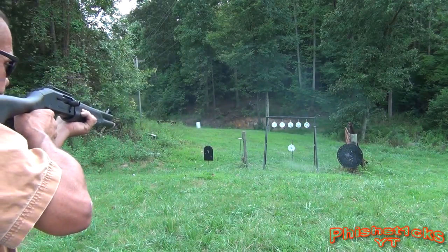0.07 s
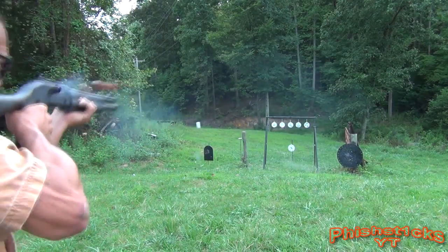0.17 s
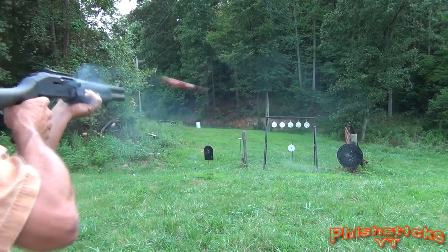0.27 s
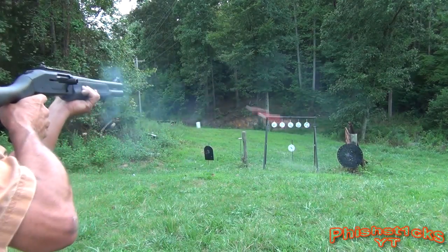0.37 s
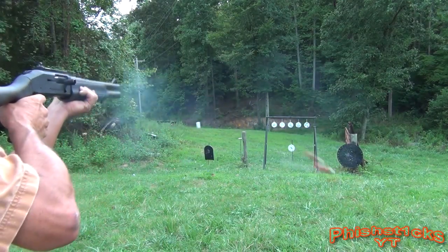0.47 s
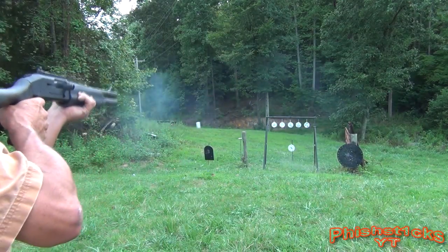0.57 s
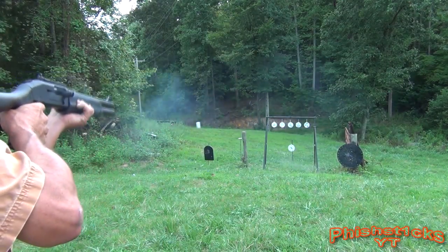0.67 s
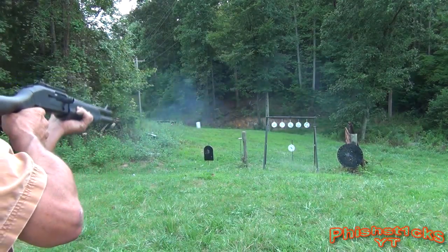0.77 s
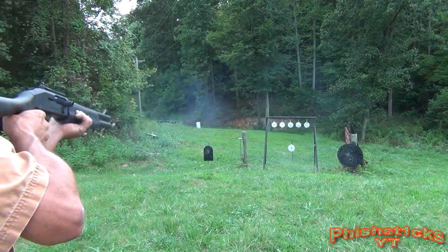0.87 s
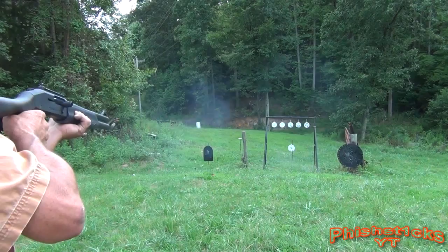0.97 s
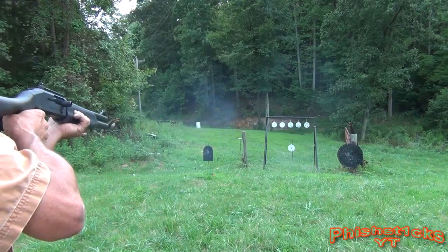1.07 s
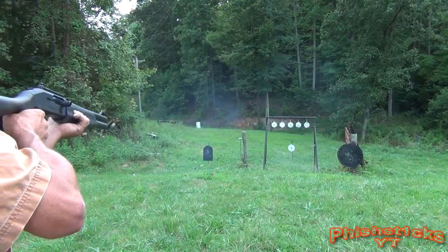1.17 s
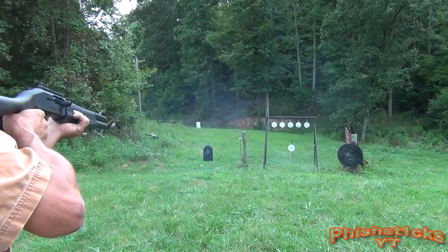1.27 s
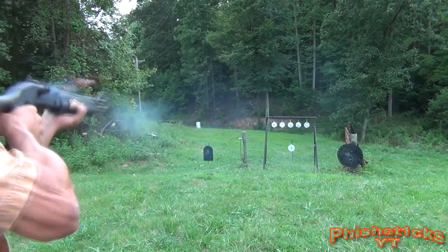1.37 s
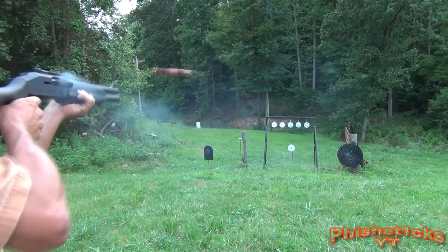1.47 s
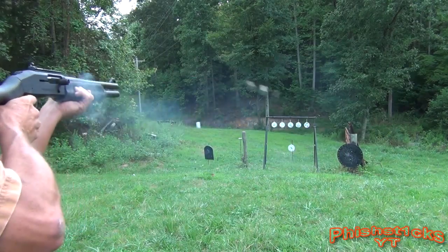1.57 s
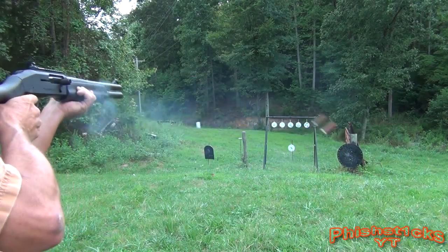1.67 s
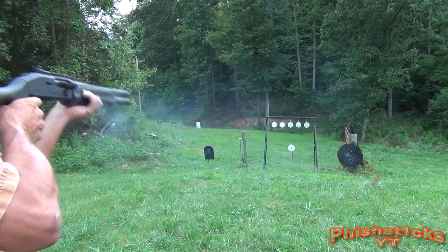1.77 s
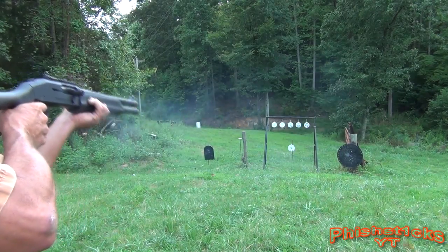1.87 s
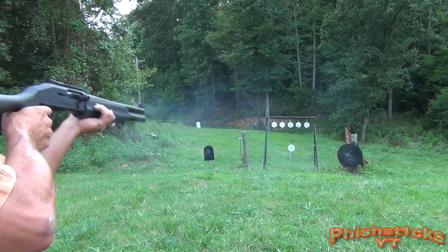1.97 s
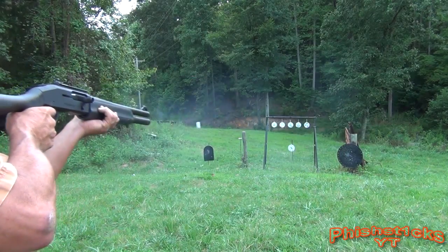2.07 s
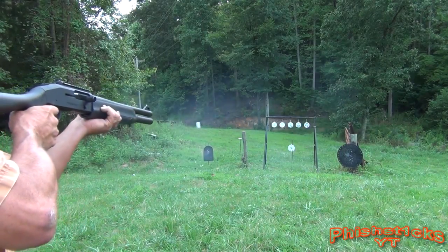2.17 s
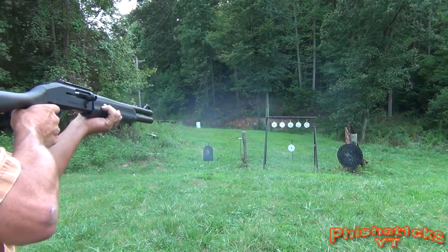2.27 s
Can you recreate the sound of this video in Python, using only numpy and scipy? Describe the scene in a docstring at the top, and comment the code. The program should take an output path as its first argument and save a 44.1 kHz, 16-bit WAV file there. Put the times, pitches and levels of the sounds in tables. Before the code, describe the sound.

Two shotgun blasts about a second apart outdoors, each hitting a ringing steel target and echoing off trees

```python
"""The return of an earlier shot is dying away over faint air hiss, a low hum and a pulsing insect.
A shotgun then fires in a grassy clearing ringed by trees: a hammer tick, then a ragged hiss of gas.
Shot cracks and spatters on a steel paddle, whose ringing modes flash as it swings, while banks and trunks
send back dull slaps (pressure ripples) over a long rolling tail (scattered random echoes).
Over a second later a second shot fires, strikes and rings in the same way."""
import sys
import numpy as np
from scipy import signal
from scipy.io import wavfile
from scipy.ndimage import uniform_filter1d

SR = 44100
rng = np.random.default_rng(int(sys.argv[2]) if len(sys.argv) > 2 else 0)


def dump(signal):
    """Clip the signal to [-1, 1] and save it as 16-bit WAV at the path in sys.argv[1]."""
    limited = np.clip(np.atleast_2d(signal).T, -1, 1)
    pcm = np.round(limited * 32767).astype(np.int16)
    wavfile.write(sys.argv[1], SR, pcm)


def attenuation_scalar(level_db):
    """Turn a level in dB into a linear amplitude multiplier (20 dB per decade)."""
    decades = np.asarray(level_db, float) / 20
    return 10 ** decades


N = 101430
T = np.arange(N) / SR

# Shots; strength sets the return only: (time [s], strength of the return [dB])
SHOTS = [(-1.35, -2.5), (.2020, 1), (1.4195, -1)]
# Slaps from banks and trunks, before the shot's strength: (delay [s], level [dB], pitch [Hz])
SLAPS = [(.0028, -6, 1250), (.0745, -8, 1200), (.0775, -13.5, 350), (.0820, -4, 800), (.184, -9, 650),
         (0.2562, -3, 850), (0.2708, -4, 950), (.308, -11, 700), (.3282, -8, 800), (.3400, -8, 900),
         (.3433, -4, 1100), (0.348, -7, 900), (.3624, -5, 1000), (.4377, -7, 850), (.4490, -9, 900)]
# Envelope of the scattered return, before the shot's strength: (delay [s], level [dB])
RETURN_LEVEL = [(0, -27.5), (.1, -20.5), (.2, -29.5), (.26, -25), (.35, -23), (.45, -22.5), (.8, -35),
                (1.2, -43), (2.4, -62)]
# Spectrum of the scattered return: (frequency [Hz], relative density [dB per Hz])
RETURN_COLOUR = [(40, -34.5), (200, -20), (340, -6), (470, 1.5), (750, -4.5), (1100, -2.5), (3000, -13),
                 (11000, -34), (16000, -73.5)]
# Fading of each band on top of the envelope, before the amount is applied: (frequency [Hz], loss [dB/s])
DULLING = [(200, 17), (400, -9.5), (3000, 12), (7000, 35), (15000, 58)]
# How alike left and right are: (frequency [Hz], likeness [0 to 1])
LIKENESS = [(200, .998), (2400, 0.92), (12000, 1)]
# Spectrum of the blast and of the air hiss: (frequency [Hz], relative density [dB per Hz])
BLAST_COLOUR = [(35, -65), (60, -26), (1060, -7), (2090, -2), (8710, -4.5), (16000, -11)]
# Shot reaching the paddle: (time [s], crack level [dB], spatter hold [s], spatter level [dB])
STRIKES = [(0.2882, -12, 0.15, -27), (1.5030, -12, 0.12, -24)]
# Spectrum of crack and spatter: (frequency [Hz], relative density [dB per Hz])
SPATTER_COLOUR = [(1500, -14.5), (3500, 0.5), (13000, 0), (16500, -21)]
# Main modes of the paddle: (frequency [Hz], relative level [dB])
PADDLE_MODES = [(3820, -6), (4432, -2), (5105, -8), (5522, -10.5), (5921, -5), (6288, -9.5), (6713, 0.8),
                (6796, -6.5), (6854, -5), (7210, -8), (7375, -8), (7660, -4.5), (7773, -3), (8009, -2.5),
                (8844, -3), (9408, -2), (10492, -9.5), (10730, -7), (11135, -13.5), (11421, -3),
                (11618, -9), (11864, -9), (10361, -9), (13670, -14), (14630, -6)]
# Ring aimed at the microphone, added to each mode's level:
# (time [s], length [s], centre [Hz], width [Hz], level [dB])
FLASHES = [(0.35, 0.085, 10950, 1500, -22.5), (0.38, 0.1, 7200, 1700, -27.5), (.32, 0.031, 9404, 40, -12.5),
           (0.417, 0.034, 9404, 40, -16), (0.498, .15, 4800, 931, -32), (0.673, 0.093, 9404, 40, -34),
           (0.852, 0.13, 6780, 29.7, -46), (0.93, 0.11, 11200, 3000, -54), (1.053, 0.09, 11135, 40, -50.5),
           (.52, .11, 5522, 40, -30), (1.69, .07, 5522, 40, -27), (.9, .18, 13670, 60, -55),
           (1.546, .03, 12850, 2600, -21.5), (1.587, 0.021, 11540, 610, -21.5),
           (1.596, 0.028, 9250, 1500, -25), (1.625, .035, 6200, 1300, -20), (1.824, 0.12, 6680, 150, -44),
           (2.0, .06, 12000, 2500, -57)]

HUM_HZ, HUM_DB, AIR_DB = 192, -63, -70
INSECT_HZ, INSECT_DB, INSECT_PER_S = 5850, -70, 26
SCATTER_PER_S, SCATTER_SPREAD_DB = 9000, 2
CLUMP_DB, CLUMP_S = 1.5, .004
DULLING_AMOUNT, COLOUR_AT_S = 0.97, 0.51  # the colour is exact at this time
SLAP_SMEAR_S, CRACKLE, CRACKLE_OCTAVES = .006, .6, 1.8
CRACK_T60, SPATTER_T60 = 0.0081, 0.33  # s to fall 60 dB
SPATTER_LATE_DB, SPATTER_LATE_T60 = -18.5, .7  # dB relative to the spatter, s
RING_DB, RING_DB_PER_CYCLE = -33.5, .008
SMALL_MODES_DB, PADDLE_LEFT_DB = -17, 0.72
BLAST_DB, BLAST_RISE_S, BLAST_HOLD_S, BLAST_T60 = -12, 0.0032, 0.012, 0.31
BLAST_RAGGED_DB = 6
HAMMER_LEAD_S, HAMMER_DB = .0065, -44.5
EDGE_HZ = 15800


def evened(x):
    """Scales to rms 1."""
    return x / np.sqrt(np.mean(x ** 2) + 1e-20)


def read(points, hz):
    """Reads a spectrum table on a log frequency axis."""
    f, value = np.transpose(points)
    return np.interp(np.log(hz + 1), np.log(f + 1), value)


def add(mix, s, sound):
    """Mixes a sound in at s seconds, which may lie before the start."""
    at = round(s * SR)
    part, sound = mix[:, max(at, 0):], sound[:, max(-at, 0):]
    n = min(part.shape[1], sound.shape[1])
    part[:, :n] += sound[:, :n]


def coloured(pair, colour, dulling=0):
    """Colours two raw signals, dulls them with time and blends them into a close stereo pair."""
    hz, t, z = signal.stft(pair, SR, nperseg=512, noverlap=384)
    same = np.clip(read(LIKENESS, hz), 0, 1)[:, None]
    mid = np.sqrt((1 + same) / 2) * z[0]
    side = np.sqrt((1 - same) / 2) * z[1]
    level = read(colour, hz)[:, None]
    loss = dulling * read(DULLING, hz)[:, None] * (t - COLOUR_AT_S)
    gain = attenuation_scalar(level - loss) / np.sqrt(np.mean(attenuation_scalar(2 * level)))
    stereo = np.array([mid + side, mid - side]) * gain
    return signal.istft(stereo, SR, nperseg=512, noverlap=384)[1][:, :pair.shape[1]]


def ripple(hz, t):
    """One smooth pressure swing: dip, peak, dip."""
    u = (np.pi * hz * t) ** 2
    return (1 - 2 * u) * np.exp(-u)


def stillness():
    """Faint air hiss throughout; a low hum and a pulsing insect tone until the first blast."""
    throb = np.maximum(-np.sin(2 * np.pi * INSECT_PER_S * T), 0)
    hum = attenuation_scalar(HUM_DB) * np.sqrt(2) * np.sin(2 * np.pi * HUM_HZ * T)
    insect = attenuation_scalar(INSECT_DB) * 2 * throb * np.sin(2 * np.pi * INSECT_HZ * T)
    hiss = coloured(rng.standard_normal((2, N)), BLAST_COLOUR)
    return (hum + insect) * (T < SHOTS[1][0]) + attenuation_scalar(AIR_DB) * hiss


def clearing():
    """What the clearing sends back of one blast: scattered small echoes and a few clear slaps."""
    sizes = attenuation_scalar(SCATTER_SPREAD_DB * np.minimum(rng.exponential(1, (2, N)), 5))
    taps = sizes * rng.choice([-1., 1.], (2, N))
    clump_n = int(CLUMP_S * SR)
    clumps = evened(uniform_filter1d(uniform_filter1d(rng.standard_normal(N), clump_n), clump_n))
    taps = taps * (rng.random((2, N)) < SCATTER_PER_S / SR) * attenuation_scalar(CLUMP_DB * clumps)
    envelope = attenuation_scalar(np.interp(T, *np.transpose(RETURN_LEVEL))) * np.minimum(T / BLAST_RISE_S, 1)
    out = coloured(evened(taps), RETURN_COLOUR, DULLING_AMOUNT) * envelope

    t = T[:600] - SLAP_SMEAR_S
    bounces = rng.random((len(SLAPS), 3, 10, 1))  # ten sharper, weaker bounces crackle around each slap
    for (delay, db, hz), (at, size, sharp) in zip(SLAPS, bounces):
        bounce_hz = hz * 2 ** (CRACKLE_OCTAVES * sharp)
        crackle = CRACKLE * (2 * size - 1) * ripple(bounce_hz, t - SLAP_SMEAR_S * (at - .3))
        wave = ripple(hz, t) + crackle.sum(0)
        add(out, delay - SLAP_SMEAR_S, attenuation_scalar(db) * np.array([wave, wave]))
    return out


def paddle():
    """Every mode rings down from the last strike and swells when the swinging face aims it this way."""
    small = np.c_[rng.uniform(3500, 14000, 40), rng.normal(SMALL_MODES_DB, 5, 40)]
    hz, db = np.transpose(np.r_[PADDLE_MODES, small])[:, :, None]
    first, second = STRIKES[0][0], STRIKES[1][0]
    t = T[::64]  # gains are drawn coarsely, then interpolated
    since = np.where(T > second, T - second, T - first)[::64]
    # modes below 9 kHz fade as fast as one at 9 kHz
    aim = attenuation_scalar(RING_DB - RING_DB_PER_CYCLE * np.maximum(hz, 9000) * since) * (since > 0)
    for s, length, centre_hz, width_hz, level in FLASHES:
        struck = max(strike[0] for strike in STRIKES if strike[0] < s)
        swing = attenuation_scalar(level) / np.cosh(2 * (t - s) / length)
        aim = aim + swing * np.exp(-((hz - centre_hz) / width_hz) ** 2) * (t > struck)
    gain = aim * attenuation_scalar(db)
    ring = sum(np.interp(T, t, g) * np.sin(2 * np.pi * (f * T + rng.random())) for f, g in zip(hz, gain))
    return np.sqrt(2) * attenuation_scalar([[PADDLE_LEFT_DB], [-PADDLE_LEFT_DB]]) * ring


def spatter(crack_db, hold_s, db):
    """A sharp crack on steel, then lead dust hissing off it, with a weaker, longer echo."""
    t = np.arange(SR) / SR
    late = np.maximum(t - hold_s, 0)
    dust = attenuation_scalar(db - 60 * late / SPATTER_T60)
    echo = attenuation_scalar(db + SPATTER_LATE_DB - 60 * late / SPATTER_LATE_T60)
    crack = attenuation_scalar(crack_db - 60 * np.maximum(t - .004, 0) / CRACK_T60)  # holds for 4 ms
    rise = np.minimum(t * 2000, 1)
    return rise * (crack + dust + echo) * coloured(rng.standard_normal((2, SR)), SPATTER_COLOUR)


def blast():
    """The hammer's tick, then a wide, ragged hiss of gas that leaps up and sags."""
    t = np.arange(SR // 2) / SR - HAMMER_LEAD_S
    sag = 60 * np.maximum(t - BLAST_HOLD_S, 0) / BLAST_T60
    shape = np.clip(t / BLAST_RISE_S, 0, 1) * attenuation_scalar(BLAST_DB - sag)
    tick = attenuation_scalar(HAMMER_DB) * (t < 0)
    ragged = attenuation_scalar(BLAST_RAGGED_DB * np.minimum(rng.exponential(1, len(t)), 3))
    gas = rng.standard_normal((2, len(t))) * ragged
    return (shape + tick) * coloured(evened(gas), BLAST_COLOUR)


def scene():
    """Shots, their returns, the struck paddle and the quiet between."""
    mix, back = stillness() + paddle(), clearing()
    for s, db in SHOTS:
        add(mix, s, attenuation_scalar(db) * back)
        add(mix, s - HAMMER_LEAD_S, blast())
    for s, *row in STRIKES:
        add(mix, s, spatter(*row))
    return mix


def band_limit(x):
    """A steep low-pass at the top of the band."""
    return signal.sosfilt(signal.butter(12, 16990, fs=SR, output="sos"), x)


def record(dry):
    """A soft ceiling rounds the peaks, then the microphone's pass band trims treble and bass."""
    soft = signal.oaconvolve(np.tanh(dry), signal.firwin(255, EDGE_HZ, fs=SR)[None], "same")
    mix = signal.lfilter(*signal.butter(1, 110, "high", fs=SR), soft)
    return band_limit(mix)


dry = scene()
out = record(dry)
dump(out)
```